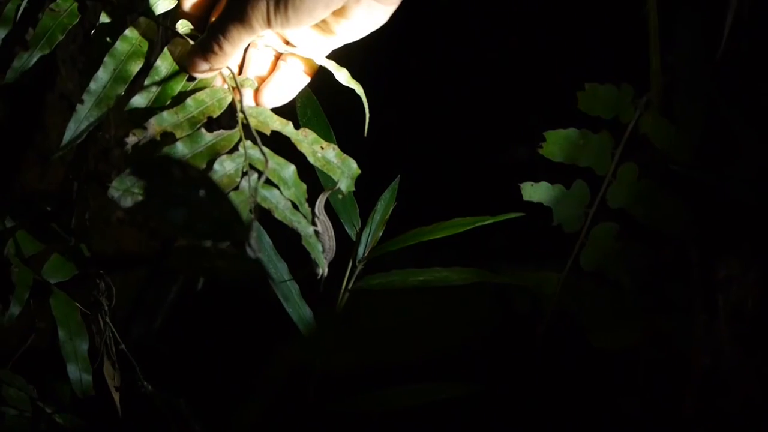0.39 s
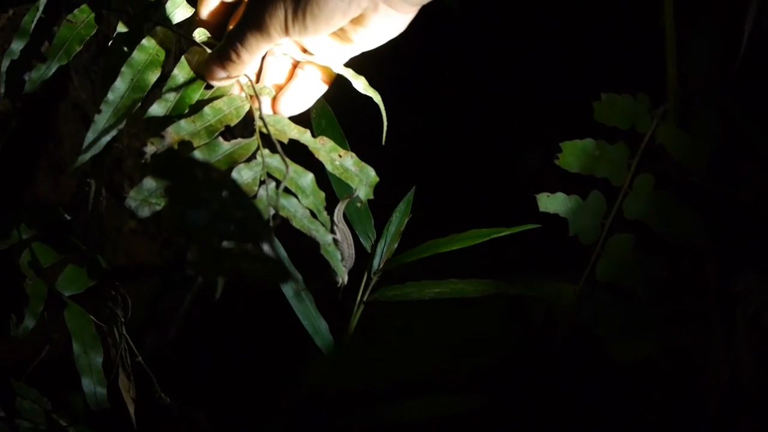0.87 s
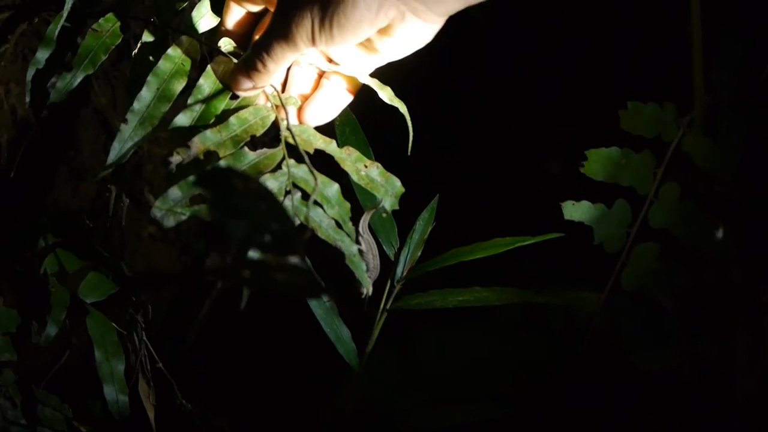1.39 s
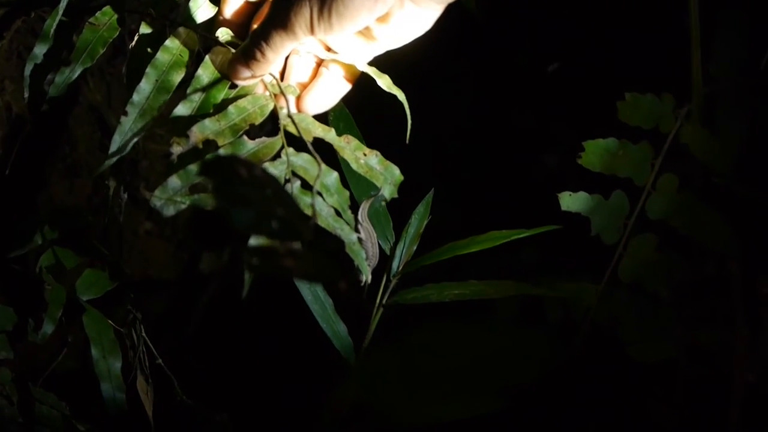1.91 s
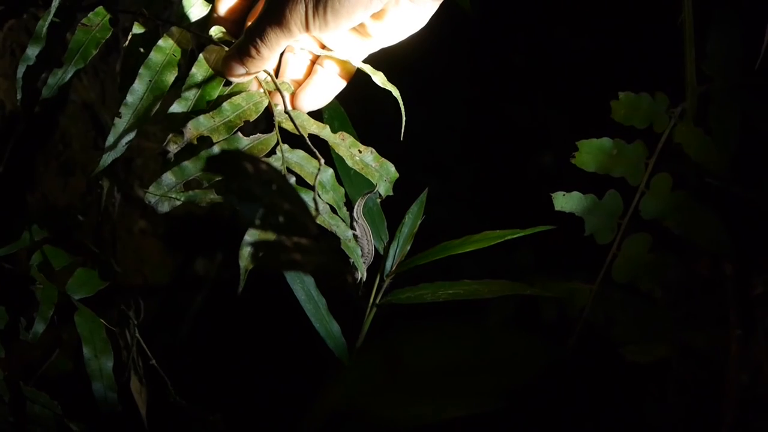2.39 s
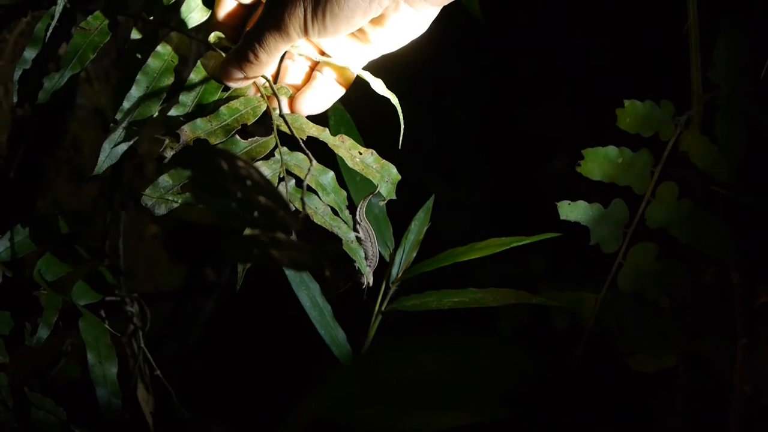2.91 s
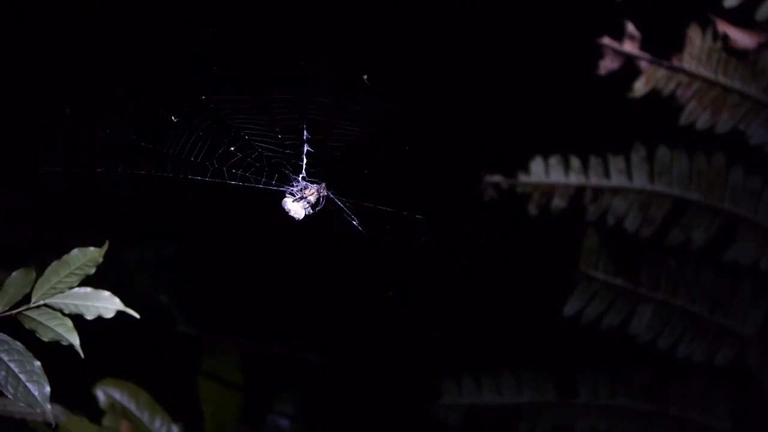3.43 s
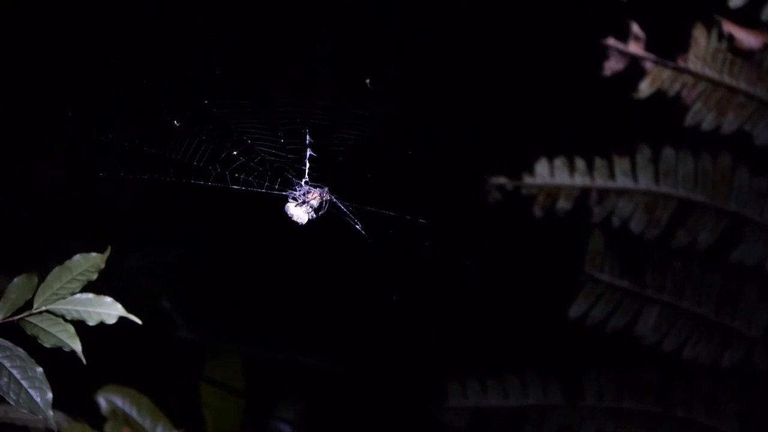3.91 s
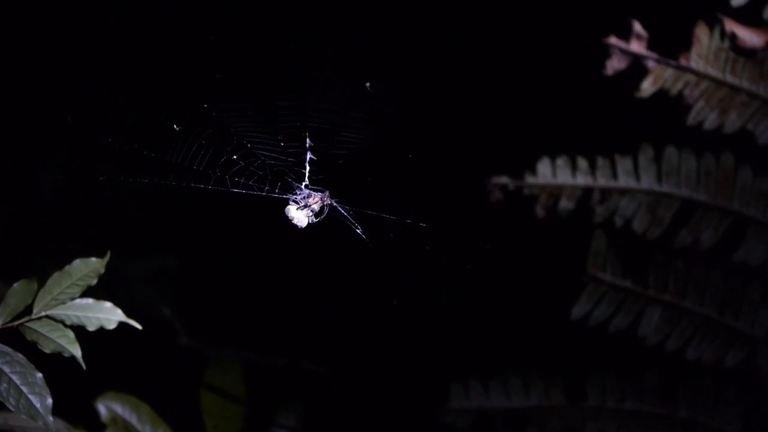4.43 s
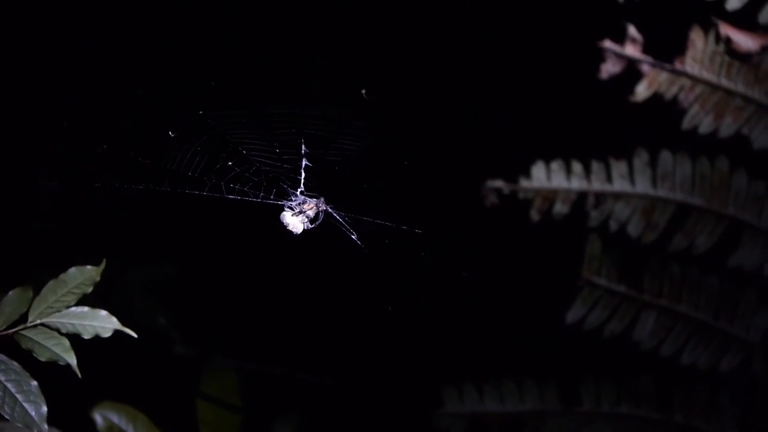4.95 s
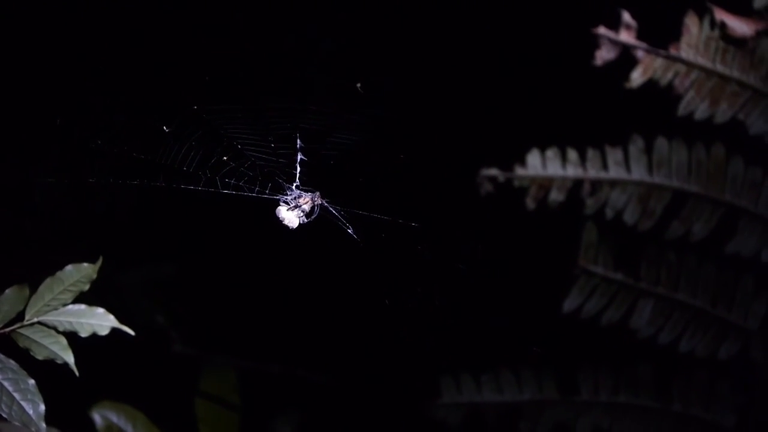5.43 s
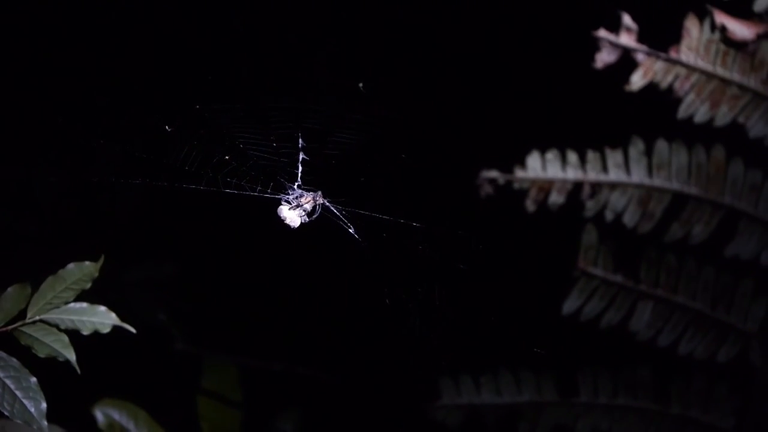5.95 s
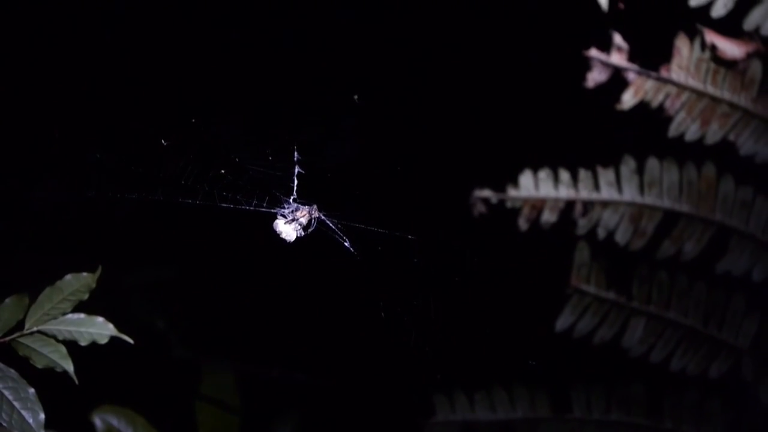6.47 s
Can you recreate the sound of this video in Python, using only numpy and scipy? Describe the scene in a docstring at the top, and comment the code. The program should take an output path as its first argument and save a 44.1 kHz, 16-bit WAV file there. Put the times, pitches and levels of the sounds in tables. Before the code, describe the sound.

Stereo outdoor night ambience from a handheld camera: a wide, bright, hissing wall of katydids with crickets shimmering below it over very faint air. Dull bumps, skin rubs and small clicks on the camera shell crowd the first half, along with three thin cricket whistles. After a tiny dropout the chorus continues with changed colour, cricket chirps swell more regularly, and handling becomes sparse until some crisp late ticks.

```python
"""A dense, throbbing rasp of katydids fills a tropical forest night, with crickets trilling below it.
Tooth strikes ring wing resonances; a split second of silence parts two spots of differing colour.
A hand rubs and knocks the handheld camera's body: slips and blows ring its shell, over faint noise for air.
A near katydid scrapes in short bursts; early on, one cricket sings three pure notes, as wavering sines."""
import sys
import numpy as np
from scipy import signal
from scipy.fft import rfft, irfft
from scipy.io import wavfile
from scipy.ndimage import uniform_filter1d

SR = 44100
rng = np.random.default_rng(int(sys.argv[2]) if len(sys.argv) > 2 else 0)


def int16_out(signal):
    """Quantize to a 16-bit WAV file."""
    q = np.round(np.clip(np.atleast_2d(signal).T, -1, 1) * 32767)
    wavfile.write(sys.argv[1], SR, q.astype(np.int16))


def nominal_scale(level):
    """Amplitude ratio for a level in decibels (scalar or array-like)."""
    x = np.asarray(level, float) / 20
    return 10 ** x


N = 290619
T = np.arange(N) / SR  # seconds
F = np.maximum(np.fft.rfftfreq(N, 1 / SR), 1)  # Hz

# Brief drops of the whole sound; the second spot begins with the last.
# Each row: start in seconds, end in seconds, gain in dB.
DROPS = [(.1143, .1215, -24), (3.2742, 3.2816, -70)]
SECOND_SPOT = T > DROPS[-1][0]
TOP_HZ = 15740  # nothing sounds above this

# Stereo image of far sound.
# Each row: frequency in Hz, side above mid in dB, left minus right in dB.
STEREO = [(30, -2, 1), (196, -10.5, -0.5), (690, -4.5, 1.5), (1380, 15.5, -2), (2730, 3, 2),
          (3500, -5.5, -1.5), (4350, -9.5, -3), (6000, -11.5, -.5), (9000, -9.5, -1.3), (11300, -8, -1),
          (13900, 3, 0.5), (15500, -6, -8)]

# Katydid chorus. Each row: time in seconds, level of the lower wing band in dB before throb and rests.
KATYDID_LEVEL = [(0, -40), (.04, -38.5), (.07, -34), (.11, -36), (.3, -34), (.65, -35), (.9, -35.5),
                 (1.7, -35), (2.3, -35.5), (3.27, -35), (3.29, -34), (4.1, -34), (4.6, -33.5), (5.4, -34.5),
                 (5.9, -34.5), (6.59, -33.5)]
# Wing colour. Each row: frequency in Hz, gain at the first spot in dB, gain at the second spot in dB.
WING_COLOUR = [(4540, -53, -53), (5260, -13.5, -22.5), (6220, -21, -21), (6985, -15, -19), (8004, -2, -5.5),
               (8600, 0.5, 0.5), (9850, -8.5, -2.5), (9760, -6.5, -4), (11900, -12.5, -7), (12130, -16, -7),
               (13800, -23, -20), (14500, -31, -25), (14900, -29, -35), (15740, -58, -36)]
# Dips between katydid phrases. Each row: centre in seconds, depth in dB for the lower band.
PHRASE_RESTS = [(.426, 2.5), (.837, 2.5), (1.109, 2), (1.286, 1.3), (1.578, 3), (1.853, 2), (2.145, 1.2),
                (2.304, 1.6), (2.449, 3), (2.73, 2), (3.005, 2.6), (3.408, 2.5), (3.671, 2.5), (3.93, 3),
                (4.177, 2), (4.454, 2.2), (4.712, 3.5), (4.975, 3), (5.234, 2.9), (5.492, 3.5), (5.766, 4),
                (6.025, 0.5), (6.15, 2.5), (6.413, 3)]
REST_S, UPPER_REST = 0.023, 1.17  # e-fold half length; upper band depth as a multiple of the lower
STROKE_S = 0.052  # nominal, rounded to fit whole strokes into each phrase
UPPER_DB = 0.43, 0.84  # upper wing band above the lower, at each spot
THROB_DB, THROB_LEAD = (0.8, 0.56), (0.1, -0.18)  # swing either way; lead in strokes, at each spot

# Trilling crickets. Each row: time in seconds, level between chirps in dB.
CRICKET_LEVEL = [(0, -46), (.05, -48.5), (.15, -45), (.6, -44), (1.3, -41.5), (3.27, -42), (3.29, -51),
                 (4.6, -48), (6.59, -50)]
# Their wing notes.
# Each row: frequency in Hz, width in Hz, level at the first spot in dB, level at the second spot in dB.
CRICKET_NOTES = [(3840, 240, -13.5, -11.5), (4023, 133, -10, -8), (4295, 440, -7, -4.5),
                 (4531, 157, -3, 2.5), (4723, 330, -1, -2.5), (4953, 350, -4.5, -8.5)]
# Chirping swells of the trill. Each row: peak in seconds, swell in dB.
CRICKET_CHIRPS = [(.098, 6.5), (.224, 5), (.456, 3), (.794, 2.5), (1.068, 3.5), (1.265, 3), (1.524, 0.5),
                  (1.923, 3), (2.113, 0), (2.474, 1), (2.68, 3.5), (2.966, 2), (3.238, 0.5), (3.3, 4),
                  (3.524, 6), (3.785, 4.5), (4.079, 4.5), (4.354, 6.5), (4.671, 0), (4.848, 1.5),
                  (5.102, 3), (5.413, 4.5), (5.7, 4), (5.982, 5.5), (6.279, 5.5), (6.58, 5)]
CHIRP_RISE_S, CHIRP_FALL_S = 0.046, 0.068
# Lowest crickets, far off. Each row: time in seconds, level in dB.
LOW_CRICKET_LEVEL = [(0, -67), (1.28, -67), (1.47, -61), (1.65, -69.5), (4.09, -68.5), (4.4, -61.5),
                     (5.12, -57.5), (6.17, -60), (6.59, -64)]
# Higher cricket that comes and goes.
# Each row: start in seconds, length in seconds, level in dB before roughening, first Hz, last Hz.
HIGH_CALLS = [(3.29, 0.135, -48.5, 5200, 5270), (4.203, .04, -45, 5150, 5150),
              (4.328, .72, -48, 5250, 5250), (5.054, 0.18, -52, 5230, 5330),
              (5.284, 0.082, -48, 5400, 5400)]
NOTE_RISE_S, PURE_RISE_S, NOTE_FALL_S = 0.02, 0.061, 0.034

# Forest air and hiss. Each row: frequency in Hz, relative density in dB per Hz.
AIR_COLOUR = [(15, -34), (25, -11), (100, -7.5), (240, -1), (420, -7), (600, 0), (950, -7), (1400, -26.5),
              (2000, -16.5), (2700, -20.5), (3300, -20), (4300, -36)]
AIR_DB = -58.5

# Shell modes of the camera body.
# Each row: frequency in Hz, relative level in dB, decay to -60 dB in seconds before a blow's extra damping.
SHELL_MODES = [(136, 5.5, 0.041), (191, 5, 0.049), (273, 9, 0.03), (406, 9, 0.041), (504, 6.5, 0.044),
               (607, 11, 0.032), (782, 4, 0.052), (976, 0, 0.053), (1174, -4.5, 0.038), (1380, -4.5, 0.061),
               (1705, 2.5, 0.028), (2080, 2.5, 0.023), (2340, 9, 0.012), (2780, 8.5, 0.01),
               (3330, 3, 0.037), (3990, 27, 0.0046), (4540, -11, 0.018), (5470, 12, 0.026),
               (6640, 6, 0.028)]
# Soft knocks. Each row: time in seconds, peak in dB before pan and bass cut, centre in Hz, reach in octaves.
SOFT_KNOCKS = [(0.0005, -28, 474, 0.7), (0.1, -40, 470, 0.41), (0.247, -37, 513, 1.5),
               (0.283, -40, 700, 1.2), (0.365, -42.5, 330, 0.48), (0.396, -41.5, 800, 1.7),
               (0.524, -32.5, 400, 2), (0.538, -30.5, 330, 1.3), (0.568, -46, 600, 0.65),
               (0.587, -43, 450, 2.1), (0.68, -39.5, 633, 1.4), (0.937, -39.5, 620, 0.71),
               (1.253, -39, 285, 0.58), (1.287, -34, 418, 0.53), (1.294, -38, 450, 0.96),
               (1.301, -19.5, 306, 0.92), (1.415, -32.5, 417, 0.87), (1.457, -32.5, 493, 1.1),
               (1.5, -27.5, 423, 1.1), (1.659, -39.5, 780, 0.88), (1.704, -47, 495, 0.76),
               (1.733, -42, 484, 0.83), (2.18, -42.5, 1030, 1.8), (2.238, -35, 287, 0.66),
               (2.325, -23.5, 497, 1.4), (2.395, -32.5, 470, 0.9), (2.428, -34, 280, 0.44),
               (2.692, -42, 284, 0.37), (2.861, -48, 396, 1.6), (2.906, -42, 479, 2.4),
               (3.021, -34, 286, 0.62), (3.114, -42.5, 242, 0.77), (3.601, -52, 140, 0.48),
               (4.509, -47.5, 140, .6), (5.017, -41, 330, 2)]
# Sharp ticks. Each row: time in seconds, peak in dB before pan and bass cut, centre in Hz,
# reach in octaves, left minus right in dB.
SHARP_TICKS = [(.0793, -34, 1280, 1, 3.5), (.1043, -31.5, 1260, 0.83, 5), (.183, -33.5, 1770, 1.07, -12),
               (.242, -36.5, 1250, 0.61, 5), (.5224, -35, 1160, 1.3, 6), (1.3028, -23.5, 3330, 2.6, 9),
               (1.5041, -35, 3100, 0.5, 4), (1.881, -48, 1550, 0.87, 2), (2.3296, -28, 1000, 0.33, 8),
               (3.8402, -46.5, 1750, 0.35, -5), (4.084, -46, 2000, .8, 6), (4.815, -42, 2470, 0.29, 1.5),
               (6.0881, -20.5, 3300, 1.43, 8), (6.3235, -25, 1500, 1.7, 5), (6.585, -25.5, 800, 1.3, 2)]
# Hand rubs. Each row: start in seconds, length in seconds, level in dB before unevenness,
# brightness from 0 dull to 2 bright (a little beyond at most).
HAND_RUBS = [(0, 0.36, -61, 0.71), (0.072, 0.055, -60, 2.1), (0.177, 0.12, -62, 1.9),
             (.51, 0.092, -51.5, 0.42), (0.513, .035, -51.5, 2.26), (0.652, 0.1, -60, 0.49),
             (0.775, 0.17, -48.5, .3), (.8, 0.18, -55, 1.63), (.99, 0.056, -50, 1.25),
             (1.072, 0.058, -47.5, 0.89), (1.15, 0.054, -58, 0.58), (1.276, 0.058, -44, 0.37),
             (1.286, 0.066, -50, 2.2), (1.372, .18, -51, 0.29), (1.484, 0.037, -55, 2),
             (1.59, 0.14, -68, 0.36), (1.976, 0.13, -58.5, 0.09), (2.166, 0.043, -52.5, 1.45),
             (2.222, 0.13, -47, 0.22), (2.36, .12, -58.5, 0.41), (2.664, 0.087, -60, 0.091),
             (2.838, .14, -51.5, 0.23), (2.847, .3, -61, 1.7), (2.972, 0.14, -61.5, 0.46),
             (5.886, 0.27, -62.5, 0.68), (6.302, 0.13, -66, 0.5)]
RUB_RISE_S, RUB_FALL_S, RUB_REACH = 0.016, 0.023, 0.65  # reach in steps of brightness
GRIP_DB = (-66, -67, -71.5)  # dull, middle and bright creep that never stops

# Near katydid. Each row: start in seconds, level in dB, fading time in seconds.
NEAR_SCRAPES = [(0.048, -39.5, 0.05), (1.007, -35.5, 0.092), (1.11, -37.5, 0.087), (1.417, -36.5, 0.093),
                (2.407, -39, 0.059), (2.497, -40, 0.05), (2.81, -41, 0.045), (3.17, -44, 0.035),
                (6.428, -49, 0.07)]

# Pure-note cricket. Each row: start in seconds, length in seconds, first level in dB, last level in dB.
PURE_CALLS = [(1.027, 0.38, -54, -45), (1.82, 0.392, -45, -42), (2.694, 0.46, -47, -52.5)]


def curve(rows):
    """Level over time, straight lines between rows of (seconds, level)."""
    s, level = np.transpose(rows)
    return np.interp(T, s, level)


def gain(hz, db):
    """Gain at every frequency from points on a log axis."""
    return nominal_scale(np.interp(np.log(F), np.log(hz), db))


def peak(hz, width):
    """Steep resonance, half gain across its width in Hz."""
    return 1 / (1 + ((F - hz ** 2 / F) / width) ** 2)


def walk(rate):
    """Random wavering: levels held 1 / rate seconds, then smoothed twice."""
    k = int(SR / rate)
    steps = np.repeat(rng.standard_normal(N // k + 1), k)
    return 0.87 * uniform_filter1d(uniform_filter1d(steps, k), k)[:N]


def clicks(per_s, spread_db):
    """Two unrelated trains of impulses of uneven size, at random moments."""
    struck = rng.random((2, N)) < per_s / SR
    sizes = rng.standard_normal((2, N)) * nominal_scale(spread_db * rng.standard_normal((2, N)))
    return struck * sizes


def bumps(rows, rise, fall):
    """Sum of smooth swells, one for each (seconds, size)."""
    return sum(size * np.exp(-((T - s) / np.where(T < s, rise, fall)) ** 2) for s, size in rows)


def held(start, length, rise, fall):
    """Envelope that rises, holds at 1 and falls once its length is over."""
    release = np.exp(-(np.maximum(T - start - length, 0) / fall) ** 2)
    return np.clip((T - start) / rise, 0, 1) * release


def far(trains, colour):
    """Sound from all round: one train feeds the mid, the other the side; mid rms 1."""
    hz, side_db, lean_db = np.transpose(STEREO)
    mid, side = rfft(trains) * colour
    side = side * gain(hz, side_db)
    left = (mid + side) * gain(hz, lean_db / 2)
    right = (mid - side) * gain(hz, -lean_db / 2)
    pair = irfft([left, right], N)
    return pair / np.std(pair.mean(axis=0))


def spots(trains, first, second):
    """The same singers in the colour of each spot."""
    return np.where(SECOND_SPOT, far(trains, second), far(trains, first))


def add(out, sound, s, pan_db=0.):
    """Place a sound at s seconds, pan_db louder on the left than on the right."""
    i = int(s * SR)
    sides = nominal_scale(np.array([[pan_db], [-pan_db]]) / 2)
    out[:, i:i + len(sound)] += (sides * sound)[:, :N - i]


def katydids():
    """File teeth strike at random and ring broad wings; whole strokes throb between the phrase rests."""
    hz, first_db, second_db = np.transpose(WING_COLOUR)
    rest_db = bumps(PHRASE_RESTS, REST_S, REST_S)
    ends = np.array([0] + [s for s, _ in PHRASE_RESTS] + [N / SR])
    strokes_per_phrase = np.round(np.diff(ends, prepend=0) / STROKE_S)
    strokes = np.interp(T, ends, np.cumsum(strokes_per_phrase))
    depth_db, lead, upper_db = (np.where(SECOND_SPOT, pair[1], pair[0])
                                for pair in (THROB_DB, THROB_LEAD, UPPER_DB))
    throb_db = depth_db * np.cos(2 * np.pi * (strokes + lead)) + 0.57 * walk(36)
    low_db = curve(KATYDID_LEVEL)
    # narrow dip where the two wing bands meet
    notch = 1 - 0.64 * peak(9050, 340)
    lower = 1 / (1 + (F / 9050) ** 40)
    lower_db = low_db - rest_db + 0.58 * walk(28)
    higher_db = low_db + upper_db - UPPER_REST * rest_db
    out = 0
    for share, db in ((lower, lower_db), (1 - lower, higher_db)):
        colours = [gain(hz, c) * notch * share * (F > hz[0]) for c in (first_db, second_db)]
        out = out + spots(clicks(30000, 1.0), *colours) * nominal_scale(db + throb_db + 0.5 * walk(13))
    return out


def note_colour(column):
    """Wing resonances of the cricket crowd summed in power, levels taken from one column."""
    return np.sqrt(sum((nominal_scale(row[column]) * peak(row[0], row[1]) ** 2) ** 2 for row in CRICKET_NOTES))


def cricket_crowd():
    """Tooth strikes ring neighbouring wing notes; the whole trill swells in chirps."""
    crowd_db = curve(CRICKET_LEVEL) + bumps(CRICKET_CHIRPS, CHIRP_RISE_S, CHIRP_FALL_S)
    trill = spots(clicks(8000, 1.6), note_colour(2), note_colour(3))
    return trill * nominal_scale(crowd_db + 0.72 * walk(40))


def low_crickets():
    """Far tooth strikes ring two lower wing resonances."""
    wings = peak(3273, 140) ** 2 + peak(3616, 520) ** 2
    return far(clicks(4000, 1.0), wings) * nominal_scale(curve(LOW_CRICKET_LEVEL))


def high_cricket():
    """A sine, steady or sliding in pitch, roughened by fast random swings of its amplitude."""
    calls, rough = 0, walk(260) * np.sqrt(2)
    for s, length, db, first_hz, last_hz in HIGH_CALLS:
        hz = np.interp(T, [s, s + length], [first_hz, last_hz])
        note = np.sin(2 * np.pi * np.cumsum(hz) / SR)
        calls = calls + note * nominal_scale(db) * held(s, length, NOTE_RISE_S, NOTE_FALL_S)
    return calls * rough


def air():
    """Faint forest air and microphone hiss: coloured noise of slowly wavering level."""
    hz, db = np.transpose(AIR_COLOUR)
    return far(rng.standard_normal((2, N)), gain(hz, db)) * nominal_scale(AIR_DB + 1.2 * walk(3.46))


def shimmer(pair, patchy_db):
    """Small patches of pitch and time swell and sink at random, alike on both sides."""
    spectrum = signal.stft(pair, nperseg=1024)[2]
    chance = uniform_filter1d(rng.standard_normal(spectrum.shape[1:]), size=4, axis=1) * 2
    boost = nominal_scale(patchy_db * chance)
    boost = boost / np.sqrt(np.mean(boost ** 2))
    return signal.istft(spectrum * boost, nperseg=1024)[1][:, :N]


def rubs():
    """Skin drags in small slips that ring the shell, in dull, middle and bright bands."""
    # short rings make broad resonances
    shell = np.sqrt(sum((nominal_scale(db) * peak(hz, 6.1 / t60)) ** 2 for hz, db, t60 in SHELL_MODES))
    near = np.array([[1, 0.032], [1, -0.33]])  # both microphones share the shell
    shapes = [held(s, length, RUB_RISE_S, RUB_FALL_S) * nominal_scale(db) for s, length, db, _ in HAND_RUBS]
    uneven_db, out = 2.5 * walk(25), 0
    bands = peak(354, 540), peak(1110, 870) ** 2, peak(2150, 2970) ** 2
    for k, band in enumerate(bands):
        drag = nominal_scale(GRIP_DB[k])
        for shape, row in zip(shapes, HAND_RUBS):
            drag = drag + shape * np.exp(-((k - row[3]) / RUB_REACH) ** 2)
        slips = near @ irfft(rfft(clicks(1200, 2.8)) * shell * band, N)
        out = out + slips / slips.std() * drag * nominal_scale(uneven_db + 1.9 * walk(30))
    return out


def blow(hz, octaves, rise, damping, rattle_db):
    """A blow rings the shell modes near hz, each in its own phase, and loose parts rattle after; peak 1."""
    t = T[:int(0.1 * SR)]
    sound = 0
    for (mode_hz, db, t60), chance in zip(SHELL_MODES, rng.standard_normal(len(SHELL_MODES))):
        share = nominal_scale(db) * np.exp(-(np.log2(mode_hz / hz) / octaves) ** 2)
        ring = np.sin(2 * np.pi * mode_hz * t + 1.68 * chance)
        sound = sound + share * ring * np.exp(-np.log(1000) * damping * t / t60)
    sound = sound * (1 - np.exp(-(t / rise) ** 2))
    # sparse fading echoes of the blow
    struck = rng.random(len(t)) < 250 / SR
    rattle = nominal_scale(rattle_db) * rng.standard_normal(len(t)) * struck * np.exp(-t / 0.03)
    sound = sound + signal.fftconvolve(sound, rattle)[:len(t)]
    return sound / np.abs(sound).max()


def hand():
    """Rubs, soft knocks and sharp ticks share one small shell, which gives no deep bass."""
    out = rubs()
    for s, db, hz, octaves in SOFT_KNOCKS:
        knock = blow(hz, octaves, rise=0.0039, damping=1.86, rattle_db=-13.0)
        add(out, nominal_scale(db) * knock, s, pan_db=0.5)
    for s, db, hz, octaves, pan_db in SHARP_TICKS:
        tick = blow(hz, octaves, rise=0.0004, damping=2.5, rattle_db=-21)
        add(out, nominal_scale(db) * tick, s, pan_db)
    return signal.sosfilt(signal.butter(2, 110, "high", fs=SR, output="sos"), out)


def scrapes():
    """A quick scrape of the file rings the wing: sudden start, rough body, fading end."""
    envelope = np.zeros((2, N))
    t = T[:int(0.25 * SR)]
    for s, db, length in NEAR_SCRAPES:
        add(envelope, nominal_scale(db) * np.minimum(t / 0.0012, 1) * np.exp(-(t / length) ** 1.7), s)
    return envelope * far(clicks(3100, 0.63), peak(7210, 2140) ** 2)


def pure_cricket():
    """A near sine, trembling at random in pitch and level, slightly to the right."""
    calls = 0
    for s, length, first_db, last_db in PURE_CALLS:
        level = nominal_scale(np.interp(T, [s, s + length], [first_db, last_db]))
        calls = calls + level * held(s, length, PURE_RISE_S, NOTE_FALL_S)
    phase = 2 * np.pi * np.cumsum(4108 + 9 * walk(60.74)) / SR
    note = np.sqrt(2) * np.sin(phase) * calls * nominal_scale(2.5 * walk(30))
    return note * nominal_scale(np.array([[-1.5], [1.5]]))


def scene():
    """Shimmering chorus and air, with the hand, the near katydid and the pure note on top."""
    crickets = cricket_crowd() + low_crickets() + high_cricket()
    chorus = shimmer(katydids() + crickets + air(), patchy_db=2.5)
    return chorus + hand() + scrapes() + pure_cricket()


def roll_off(x):
    """The treble ends steeply here."""
    return signal.sosfilt(signal.butter(12, 16520, fs=SR, output="sos"), x)


def record(dry):
    """The top is trimmed and the level drops briefly, with softened edges."""
    trimmed = irfft(rfft(dry) * (F < TOP_HZ), N)
    drop_db = sum(db * ((T > start) & (T < end)) for start, end, db in DROPS)
    mix = trimmed * uniform_filter1d(nominal_scale(drop_db), size=30)
    return roll_off(mix)


dry = scene()
out = record(dry)
int16_out(out)
```